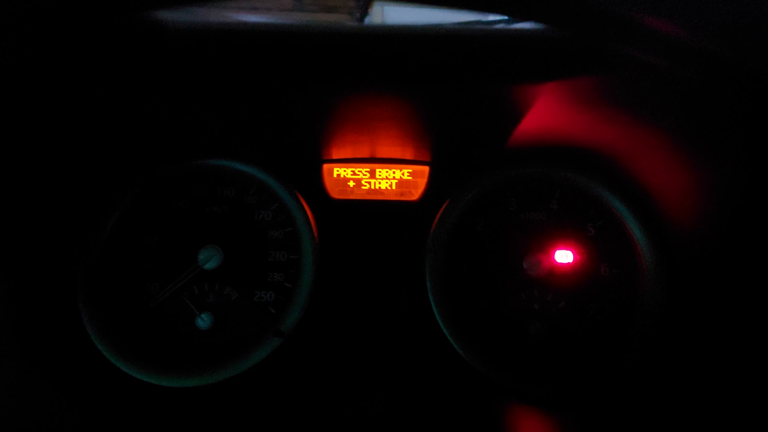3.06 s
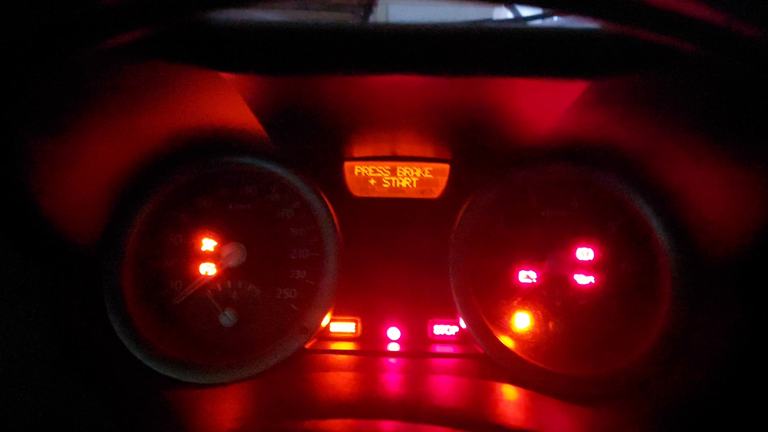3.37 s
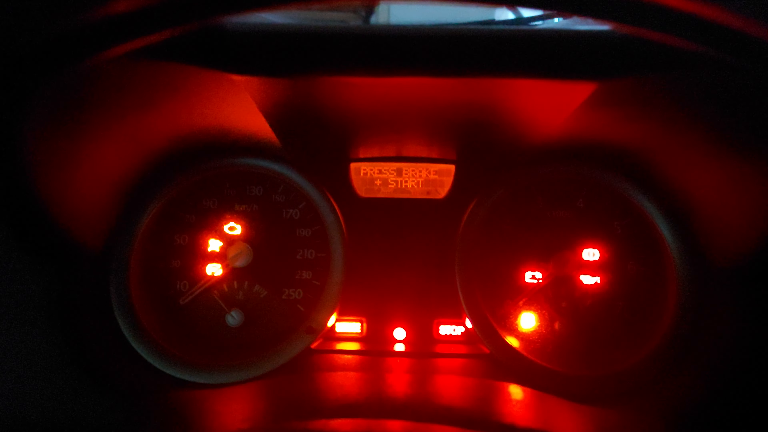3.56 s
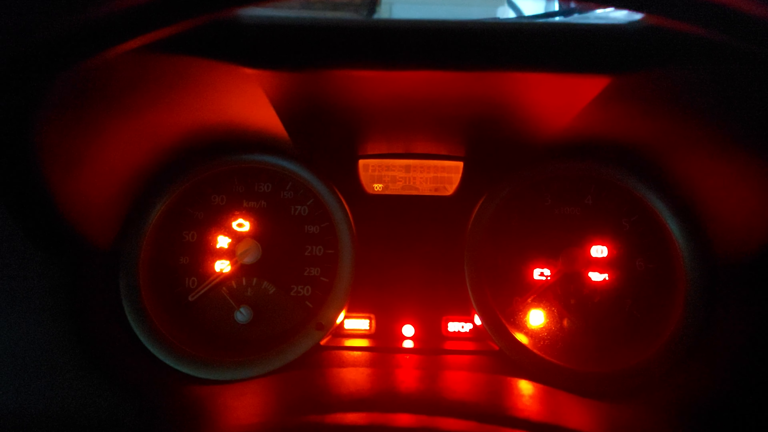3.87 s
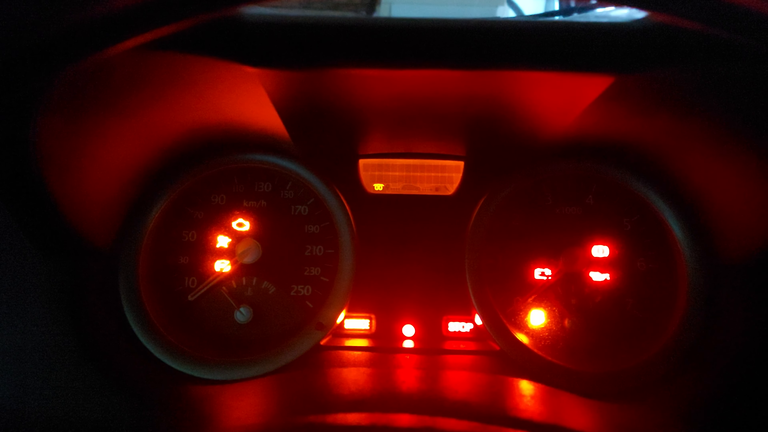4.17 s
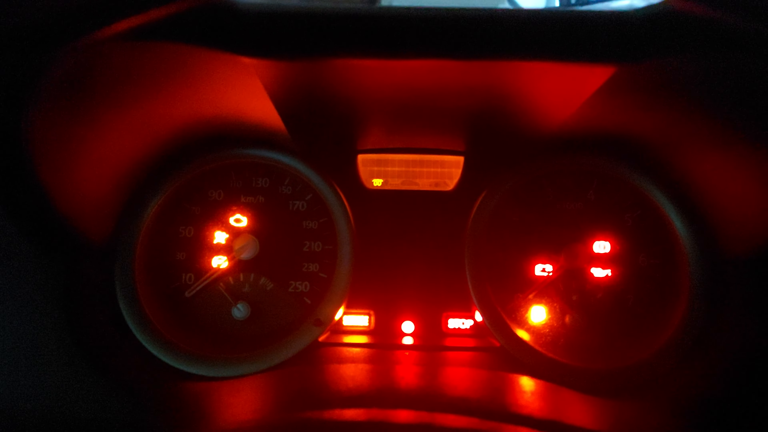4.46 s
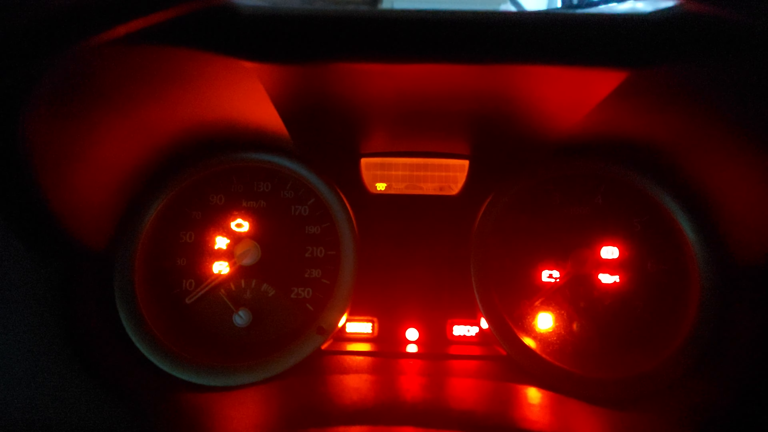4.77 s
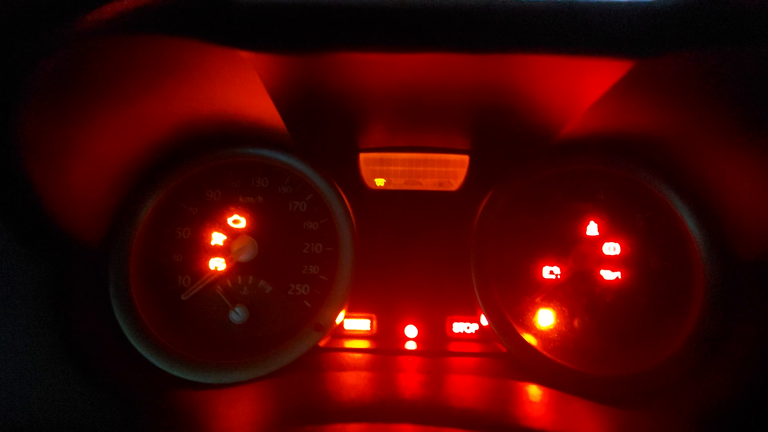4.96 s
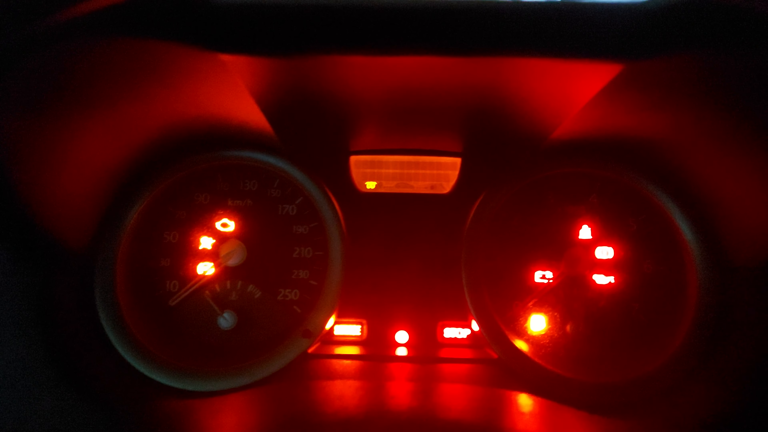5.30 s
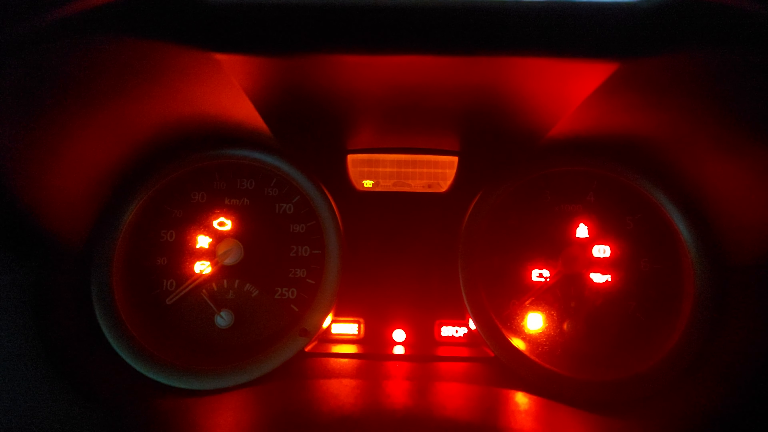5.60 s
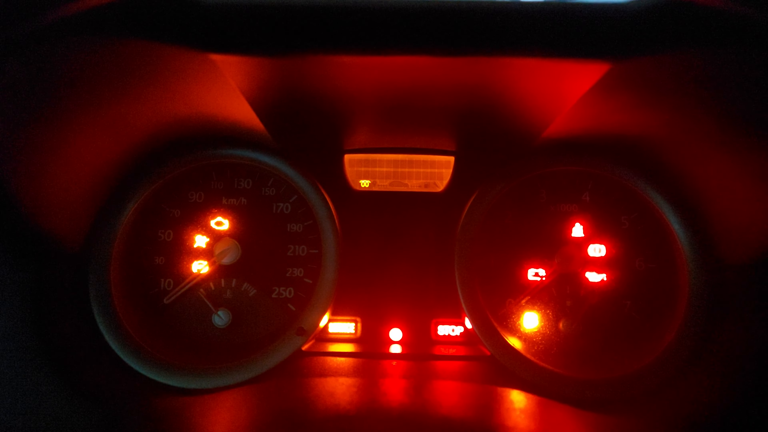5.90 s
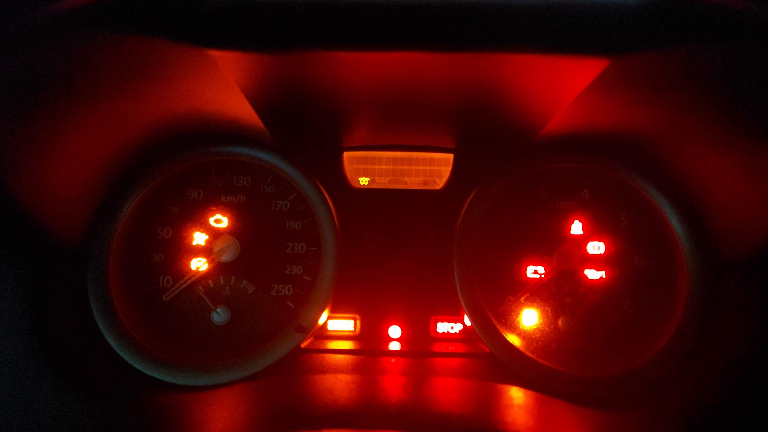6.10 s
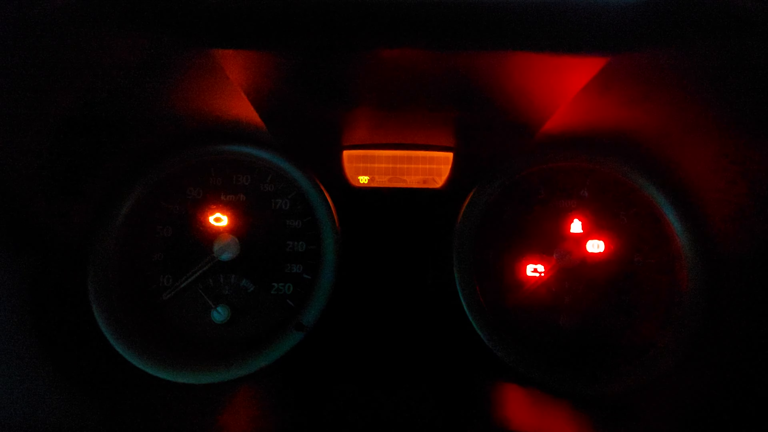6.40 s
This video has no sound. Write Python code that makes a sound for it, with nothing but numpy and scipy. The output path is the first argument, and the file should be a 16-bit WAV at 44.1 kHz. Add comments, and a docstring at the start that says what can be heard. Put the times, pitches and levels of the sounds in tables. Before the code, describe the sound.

A close stereo perspective inside a parked car, small and upholstered with very short dull reflections. A faint wavering low hum, still air and thin hiss run throughout. From 0 to 1.2 s someone shifts weight: dull seat groans, grainy cloth scrapes, sleeve swishes and soft low bumps, with a faint double click near 1.05. A heavy padded thud lands at 1.57, a weaker one at 1.74, then a tiny dry tick at 1.81. Quiet knocks come at 2.3 and 2.45, a small click at 2.65. At 2.99 a hollow click precedes a fast plastic judder and loud snap at 3.15-3.18, leaning left. Duller clicks follow at 3.26, 3.33, 3.58 and 3.89. A relay pair at 4.56 and 4.60 leaves a thin fluttering ring and brief fizz on the right. Thereafter a muffled boom surges unevenly, with rough rumble, soft whirr and faint ticking, about ten per second then slower, until 6.5.

```python
"""A driver shifts in the seat of a parked diesel car, bumps the footwell and snaps a plastic catch home.
Seat, cloth, sleeves, hiss swells and scrapes are coloured noise, some in grains; bumps and catch modes are sines.
Relays click in the dashboard as short noise bursts with a note each, and a thin spring note follows.
A low hum, a soft boom and hiss lie under it all; late on the boom grows under the bonnet,
with a noise rumble and whirr over it and faint quick ticking."""
import sys
import numpy as np
from scipy import signal
from scipy.fft import rfft, irfft, next_fast_len
from scipy.io import wavfile

SR = 44100
rng = np.random.default_rng(int(sys.argv[2]) if len(sys.argv) > 2 else 0)


def unload_wav(signal):
    """Save mono or channel-first audio to the path in sys.argv[1] as 16-bit WAV at rate SR, clipped to [-1, 1]."""
    wavfile.write(
        sys.argv[1],
        SR,
        np.round(np.clip(np.atleast_2d(signal).T, -1, 1) * 32767).astype(np.int16),
    )


N = 288414
TIME = np.arange(N) / SR
SHORT_TIME = TIME[:SR // 2]   # half a second, enough for any single blow

# switches and relays in the dashboard: (t/s, level/dB, note f/Hz, then relative to the level:
# note/dB, hollow/dB, crack/dB)
CLICK_EVENTS = [(1.045, -47.5, 532, -4, -4, 6), (1.091, -55.5, 515, 3.5, 2, 10),
                (2.649, -44, 1700, -9.5, -4, -1), (2.975, -44.5, 1110, -3, -3, 0),
                (2.991, -28.5, 573, -7.5, -2, -10.5), (3.256, -32.5, 559, -8.5, -3.5, -14),
                (3.33, -44, 636, 1.5, -7.5, -5.5), (3.575, -45, 813, 2, -3.5, -9),
                (3.866, -56, 2070, -6.5, -0.5, -21), (3.891, -42, 2082, -1, -9.5, -26),
                (4.563, -41, 598, -2, -17, -14.5), (4.605, -38, 845, 5, -7.5, -8.5)]
# colour of the hollow dashboard and trim: (f/Hz, level/dB)
HOLLOW_COLOUR = [(180, -14), (320, -1.5), (420, -8), (560, -2.5), (720, -6.5), (950, -22.5)]
# colour of the stiffer panel: (f/Hz, level/dB)
PANEL_COLOUR = [(550, -19.5), (820, -1), (1050, -2), (1400, -2), (1900, 0.5), (2300, -5), (2700, -15.5),
                (4000, -24)]


def from_db(db):
    """Decibels to gain."""
    return 10 ** (np.asarray(db) / 20)


def rms_one(x):
    """Scale to unit power."""
    return x / np.sqrt(np.mean(x ** 2) + 1e-20)


def in_time(rows):
    """Each column of a curve at every sample, in straight lines between its points."""
    s, *columns = np.transpose(rows)
    return [np.interp(TIME, s, c) for c in columns]


def at_hz(points, hz):
    """Read a table along log frequency."""
    f, value = np.transpose(points)
    return np.interp(np.log(hz + 1e-6), np.log(f), value)


def pan(left_db):
    """Left and right gains; a positive level difference favours the left."""
    return from_db(np.array([[.5], [-.5]]) * left_db)


def sine(hz):
    """A short sine for one blow."""
    return np.sin(2 * np.pi * hz * SHORT_TIME)


def noise(spectrum):
    """Stereo noise of a given colour, steep beyond its ends, rms 1; the ears agree most in the upper bass."""
    # how alike the two ears are: (f/Hz, left-right likeness from 0 to 1)
    ear_likeness = [(50, 0), (130, .95), (300, 0.49), (700, 0.25), (1500, 0), (4000, 0)]
    size = next_fast_len(N)
    hz = np.arange(size // 2 + 1) * SR / size + 1e-3
    skirts = np.minimum(1, np.minimum(hz / spectrum[0][0], spectrum[-1][0] / hz)) ** 4
    alike = np.clip(at_hz(ear_likeness, hz), -1, 1)
    mid, side = rfft(rng.standard_normal((2, size)))
    both = np.sqrt(1 + alike) * mid + np.sqrt(1 - alike) * side * [[1], [-1]]
    coloured = both * skirts * from_db(at_hz(spectrum, hz))
    return rms_one(irfft(coloured, size)[:, :N])


def drift(rate):
    """A random glide of rms 1 that heads for a new value rate times a second."""
    steps = rng.standard_normal(16384)
    return rms_one(np.interp(TIME * rate, np.arange(len(steps)), steps))


def grains(per_s, t60):
    """Tiny uneven slips at random times, each dying away, as a level of unit power."""
    sizes = (rng.random(N) < per_s / SR) * rng.uniform(0.3, 1, N) ** 2
    decay = from_db(-60 / (t60 * SR))
    return rms_one(signal.lfilter([1], [1, -decay], sizes + 1e-18))


def add(track, s, sound):
    """Mix a short sound into a track at time s."""
    start = int(s * SR)
    track[..., start:start + sound.shape[-1]] += sound[..., :N - start]


def dying(t60, rise=0.0016):
    """A quick rise and an exponential decay."""
    return (1 - np.exp(-SHORT_TIME / rise)) * from_db(-60 * SHORT_TIME / max(t60, 1e-3))


def swell(peak_s, steep):
    """A soft rise to 1 at peak_s and a slower fall."""
    t = SHORT_TIME / peak_s
    return (t * np.exp(1 - t)) ** steep


def cabin(x, t60, wet_db):
    """Dense, short, dull reflections from glass and upholstery, as decaying noise."""
    echo_colour = [(200, 9.5), (2000, -12.5), (3500, -14.5), (16000, -21)]
    echo = noise(echo_colour)[:, :SR // 2] * dying(t60, rise=0.0015)
    echo /= np.sqrt(np.sum(echo ** 2, axis=1, keepdims=True))
    return x + from_db(wet_db) * signal.fftconvolve(x, echo, axes=1)[:, :N]


def background():
    """A slightly wavering hum of harmonics, still air and faint hiss."""
    # steady hum: (multiple of the base pitch, level/dB)
    hum_partials = [(1, -61.5), (2, -65.5), (3, -58.5), (4, -78), (5, -78.5), (7, -85), (9, -69),
                    (10, -77.5)]
    # still air in the cabin: (f/Hz, level/dB)
    air_colour = [(28, -14), (55, 0), (115, -8.5), (190, -23), (310, -21), (420, -30), (650, -34.5),
                  (950, -42), (2200, -47.5)]
    # hiss colour: (f/Hz, level/dB)
    hiss_colour = [(1500, -7), (2160, -4), (2700, -8.5), (5000, -9), (8000, -3), (9500, -6), (12000, 0.5),
                   (16000, -2)]
    # hiss over time: (t/s, level/dB)
    hiss_curve = [(0, -66), (1.3, -77), (2.6, -71.5), (4.2, -77.5), (6.5, -77)]
    hum_hz, air_db = 32.85, -57
    turn = 2 * np.pi * np.cumsum(hum_hz * (1 + 0.0033 * drift(13))) / SR
    hum = 0
    for multiple, db in hum_partials:
        phase = rng.uniform(0, 2 * np.pi) + np.array([[.15], [-.15]])   # cabin modes reach each ear differently
        level = from_db(db + drift(20)) * np.sqrt(2)
        hum = hum + level * np.sin(multiple * turn + phase)
    hiss_db, = in_time(hiss_curve)
    low = hum + from_db(air_db) * noise(air_colour)
    return low * pan(1.7) + from_db(hiss_db) * noise(hiss_colour)


def motor():
    """A wavering cabin boom follows the load; rumble and whirr join it late and throb at its pitch."""
    # load on the motor, as the course of its boom: (t/s, level/dB)
    load_curve = [(4.3, -54.5), (4.47, -50), (4.88, -43.5), (5.17, -48.5), (5.5, -43.5), (5.85, -47),
                  (6.12, -55), (6.35, -45.5)]
    # rough rumble: (f/Hz, level/dB)
    rumble_colour = [(70, 3.5), (110, -10.5), (150, -5), (190, -21.5), (290, -18.5), (340, -25.5)]
    # whirr above it: (f/Hz, level/dB)
    whirr_colour = [(300, 0), (380, -1), (520, 2.5), (580, -2.5), (820, -6.5), (1050, -28.5), (1600, -29.5),
                    (2200, -19.5), (2600, -32)]
    boom_hz, boom_trim_db = 51.8, -1.37
    start_s, run_up_s, whirr_db = 4.49, 0.21, -66
    crest_s, crest_db, slope_db_per_s = 6.01, -50, 6   # the rumble swells to a crest and eases off
    boom_db, = in_time(load_curve)
    turn = 2 * np.pi * np.cumsum(boom_hz * (1 + 0.026 * drift(2.1))) / SR
    boom_level = from_db(boom_db + boom_trim_db) * from_db(2 * drift(13)) * np.sqrt(2)
    boom = boom_level * np.sin(turn + np.array([[.2], [-.2]]))
    running = np.clip((TIME - start_s) / run_up_s, 0, 1)
    rumble_db = crest_db - slope_db_per_s * np.abs(TIME - crest_s)
    rumble = from_db(rumble_db + 3.4 * drift(16)) * noise(rumble_colour)
    whirr = from_db(whirr_db) * noise(whirr_colour)
    throb = 1 + 0.092 * np.sin(turn)
    return (boom + running * (rumble + whirr) * throb) * pan(1.2)


def held(s, length):
    """The effort of a shift: it rises smoothly over part of its length, holds and dies away."""
    attack_share, release_s = 0.47, 0.031
    rise = np.clip((TIME - s) / (attack_share * length), 0, 1)
    release = np.exp(-np.maximum(TIME - s - length, 0) / release_s)
    return np.sin(rise * np.pi / 2) ** 2 * release


def driver():
    """The seat groans dully, cloth scrapes in coarse grains; sleeves and swells of hiss swish in fine ones."""
    # the driver shifts weight: (t/s, length/s, seat level/dB, cloth level/dB, sleeve level/dB)
    weight_shifts = [(0.161, 0.26, -47, -62, -52), (0.403, 0.2, -46, -50.5, -57.5),
                     (0.613, 0.14, -50.5, -56.5, -61.5), (0.738, 0.074, -41.5, -50, -63.5),
                     (0.961, 0.15, -45.5, -66.5, -67)]
    # soft grainy swishes and faint swells of hiss: (middle t/s, half length/s, level/dB)
    hiss_swells = [(0.019, 0.15, -57.5), (1.598, 0.043, -64.5), (1.7, 0.032, -69), (2.097, 0.049, -72.5),
                   (2.67, 0.083, -69.5), (3.45, 0.14, -57.5), (3.67, 0.061, -72.5), (4.117, 0.064, -60)]
    # dull groan of the seat: (f/Hz, level/dB)
    seat_colour = [(70, -8), (100, 4.5), (175, -3), (230, -9), (320, -4), (500, -21.5)]
    # cloth on the seat: (f/Hz, level/dB)
    cloth_colour = [(300, -6.5), (420, -21), (580, -2.5), (900, -18), (2100, -15), (3000, -30)]
    # swish of the sleeves and the hiss swells: (f/Hz, level/dB)
    swish_colour = [(410, -2), (700, -4), (922, -9), (1600, -0.5), (2880, -8.5), (3370, -9), (7790, -11.5),
                    (9110, -16.5), (11700, -11), (16000, -15.5)]
    seat, cloth, sleeve = np.zeros((3, N))
    for s, length, seat_db, cloth_db, sleeve_db in weight_shifts:
        effort = held(s, length)
        seat += from_db(seat_db) * effort
        cloth += from_db(cloth_db) * effort
        sleeve += from_db(sleeve_db) * effort
    hiss = np.zeros(N)
    for s, half, db in hiss_swells:
        hiss += from_db(db) * np.exp(-np.abs((TIME - s) / half) ** 3)
    coarse, fine = grains(330, t60=.04), grains(2000, t60=.022)
    body = seat * noise(seat_colour) + cloth * coarse * noise(cloth_colour) * pan(6.3)
    swish = sleeve * pan(2.3) + hiss * pan(2)
    return body + swish * fine * noise(swish_colour)


def rebounds(s, db, count):
    """A blow and its returns, the first much weaker and each later one a little weaker still: (t/s, level/dB)."""
    every_s, first_db, loss_db = 0.034, -15.5, 3.5
    returns = [(s + (k + 1) * every_s, db + first_db - k * loss_db) for k in range(count)]
    return [(s, db)] + returns


def bumps():
    """Padded blows swell a damped low resonance; the trim knocks with them and a dull scuff lingers after."""
    # soft bumps on the floor and seat: (t/s, level/dB, f/Hz)
    bump_events = [(0.238, -29, 117), (.438, -34.5, 127), (0.803, -30, 105.4), (0.919, -45.5, 267),
                   (1.002, -39.5, 117), (1.135, -33, 98), (1.568, -14, 131.3), (1.738, -28, 137.6),
                   (2.996, -39.5, 121), (3.031, -41.5, 110.2)]
    knock_colour = [(380, 4.5), (500, 9.5), (620, 3), (900, -35), (1500, -18.5)]
    scuff_colour = [(40, -2), (90, 14), (200, -1.5), (330, -2.5), (520, -19.5), (750, -24.5),
                    (2000, -46), (4500, -41.5)]
    swell_s = 0.015
    thud, push, scuff = np.zeros((3, N))
    for start, first_db, hz in bump_events:
        for s, db in rebounds(start, first_db, count=3):
            shape = from_db(db) * swell(swell_s, steep=4.5)
            add(thud, s, shape * sine(hz))
            add(push, s, shape)
            add(scuff, s, from_db(db) * swell(swell_s, steep=1))
    knock = from_db(-22) * push * noise(knock_colour)
    return thud + knock + from_db(-14.5) * scuff * noise(scuff_colour)


def knocks():
    """Soft contacts build up slowly and sound the hollow trim, with little of its panel."""
    # dull knocks on the hollow trim: (t/s, level/dB)
    knock_events = [(0.747, -36), (0.811, -39), (1.576, -38), (2.314, -43), (2.45, -54)]
    force = np.zeros(N)
    for s, db in knock_events:
        add(force, s, from_db(db) * dying(0.081, rise=0.0022))
    trim = noise(HOLLOW_COLOUR) + from_db(-17) * noise(PANEL_COLOUR)
    return force * trim * pan(5.3)


def ticks():
    """Tiny dry bursts of bright noise, and a short fizz on the right after the last relay."""
    # sharp ticks: (t/s, level/dB, decay t60/s, left over right/dB)
    tick_events = [(.906, -60.5, 0.093, -5), (1.368, -46.5, 0.058, -2), (1.8122, -40.5, 0.0036, 38.5),
                   (2.096, -58.5, 0.043, -14), (4.563, -42.5, 0.069, 1)]
    tick_colour = [(700, -10), (2000, -3), (4000, 5), (8000, 7.5), (12000, 4), (16000, -0.5)]
    fizz_colour = [(3500, -13), (5000, -13.5), (7500, 2), (9500, -7.5), (11500, -2.5), (16000, -9)]
    level = np.zeros((2, N))
    for s, db, t60, side in tick_events:
        add(level, s, from_db(db) * pan(side) * dying(t60, rise=.0001))
    fizz_shape = np.interp(TIME, [4.63, 4.638, 4.69, 4.712], [0.025, 1, 0.61, 0])
    fizz = fizz_shape * from_db(-57) * pan(-20.5)
    return level * noise(tick_colour) + fizz * noise(fizz_colour)


def clicks():
    """Each click shakes the hollow dashboard, a panel with a note of its own, and cracks briefly on top."""
    # bright crack of the contacts: (f/Hz, level/dB)
    crack_colour = [(2000, 10), (3000, -6.5), (4300, 1), (5800, 2), (8000, 3.5), (9300, -6), (11000, 0),
                    (14000, -6), (16000, -5)]
    contact_s = 0.0015   # rise of a contact whose crack is at 0 dB
    panel_t60, hollow_t60, crack_t60, note_t60 = 0.073, 0.073 * 1.1, 0.073 * 0.96, 0.095   # s
    hollow, panel, crack, note = np.zeros((4, N))
    for s, db, hz, note_db, hollow_db, crack_db in CLICK_EVENTS:
        rise = contact_s * from_db(-.4 * crack_db)   # dull contacts are soft and build up slowly
        add(hollow, s, from_db(db + hollow_db) * dying(hollow_t60, rise=rise))
        add(panel, s, from_db(db) * dying(panel_t60, rise=rise))
        add(crack, s, from_db(db + crack_db) * dying(crack_t60, rise=0.00078))
        add(note, s, from_db(db + note_db) * dying(note_t60, rise=rise) * sine(hz))
    loose = 1 + 0.76 * drift(250)   # the panel buzzes in its clips
    ringing_panel = (panel * noise(PANEL_COLOUR) + note * loose) * pan(0.94)
    body = hollow * noise(HOLLOW_COLOUR) + ringing_panel
    return body * pan(2.5) + crack * noise(crack_colour) * pan(-3.5)


def slips(count):
    """Evenly spaced slips, each harder than the one before, counted back from the last: (t/s, level/dB)."""
    last_s, every_s = 3.168, 0.01114
    last_db, growth_db = -9, 4
    return [(last_s - k * every_s, last_db - k * growth_db) for k in range(count)]


def catch():
    """Plastic judders over plastic, each slip ringing its modes, then the catch snaps home and rattles out."""
    # what the catch rings with: (f/Hz, level/dB, decay t60/s)
    catch_modes = [(340, -26, .07), (549.4, -17, 0.063), (822.4, -19, 0.033), (1164, -18.5, 0.049),
                   (1574, -20.5, .05), (1826, -19, 0.09), (1976, 5, 0.016), (2160, -12.5, .04),
                   (4240, -15, .012)]
    # plastic scraping: (f/Hz, level/dB)
    scrape_colour = [(250, -20.5), (550, -4.5), (1000, -7.5), (1500, -11.5), (2000, 1), (2700, -16),
                     (3700, -6.5), (5600, -22.5), (9000, -23.5), (11300, -20.5), (16000, -35)]
    # the snap: (f/Hz, level/dB)
    snap_colour = [(200, -23.5), (330, -8), (450, -12.5), (640, 4), (950, -11.5), (1530, 4.5), (2300, -2),
                   (2650, -11.5), (3600, -10), (4350, -2.5), (5200, -10.5), (9000, -15.5), (11000, -6.5),
                   (14000, -13), (16000, -25)]
    snap_s, creep_s, creep_db = 3.1775, 0.007, -30
    side_db, shadow_hz = 13, 1000   # modes lean further left as they rise, fully so from shadow_hz up
    grit, snap, rings = np.zeros(N), np.zeros(N), np.zeros((2, N))
    run = slips(count=4)
    first_slip_s = run[-1][0]
    add(grit, first_slip_s - creep_s, from_db(creep_db) * swell(creep_s, steep=5.9))   # scrapes before it slips
    for s, db in run:
        add(grit, s, from_db(db) * dying(0.07, rise=.002))
        for hz, mode_db, t60 in catch_modes:
            side = pan(side_db * min(hz / shadow_hz, 1))
            add(rings, s, side * from_db(db + mode_db) * dying(t60, rise=0.001) * sine(hz))
    add(snap, snap_s, from_db(-16.5) * dying(0.067, rise=0.002))
    add(snap, snap_s, from_db(-13.5) * swell(.0028, steep=1.6))
    scrape = from_db(-6) * grit * noise(scrape_colour) * pan(5.5)
    return from_db(2) * rings + scrape + snap * noise(snap_colour) * pan(5.5)


def spring():
    """One thin fluttering note, set ringing by the last click and damped a quarter of a second later."""
    # the spring: (level/dB, decay t60/s)
    db, t60 = (-65.5, 0.67)
    damper = np.interp(SHORT_TIME, [.21, .27], [1, 0])
    out = np.zeros(N)
    add(out, CLICK_EVENTS[-1][0], from_db(db) * dying(t60) * damper * sine(1400))
    return out * (1 + 0.3 * drift(53))


def ticking():
    """About ten times a second, then slower, a gritty rub swells and leads into a sharp tick."""
    # quick ticking over the rumble: (tick t/s, rub level/dB, tick level/dB)
    ticking_events = [(4.85, -75, -56), (4.951, -60, -53.5), (5.056, -66, -52.5), (5.167, -67.5, -74),
                      (5.267, -68, -59.5), (5.377, -65.5, -70.5), (5.52, -71.5, -56), (5.688, -83.5, -60.5),
                      (5.832, -85, -67.5)]
    # colour of rub and tick: (f/Hz, level/dB)
    ticking_colour = [(1000, -0.5), (1700, 11.5), (2900, -5), (4400, 7), (5500, -4.5), (7200, 5),
                      (9500, 1.5), (11500, 8), (15000, -9)]
    lead_s, swell_s, tick_t60 = 0.042, 0.024, 0.095
    rub, tick = np.zeros((2, N))
    for s, rub_db, tick_db in ticking_events:
        add(rub, s - lead_s, from_db(rub_db) * swell(swell_s, steep=1.46))
        add(tick, s, from_db(tick_db) * dying(tick_t60, rise=0.00062))
    grit = grains(1300, t60=.011)
    return (rub * grit + tick) * noise(ticking_colour) * pan(7.5)


def scene():
    """Hard sounds ring briefly in the cabin over the soft and steady ones."""
    hard = cabin(catch() + clicks() + knocks(), t60=0.12, wet_db=-15.5)
    soft = driver() + bumps() + ticks() + spring()
    return hard + soft + background() + motor() + ticking()


def record(dry):
    """Peaks are rounded and the top is cut steeply at 16 kHz."""
    low_pass = signal.ellip(10, .2, 80, 16000, fs=SR, output="sos")
    return signal.sosfilt(low_pass, np.tanh(dry))


dry = scene()
out = record(dry)
unload_wav(out)
```